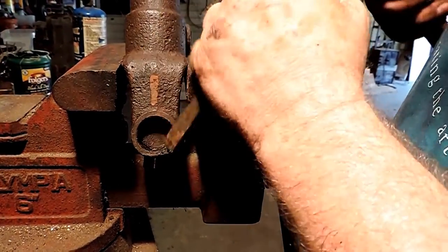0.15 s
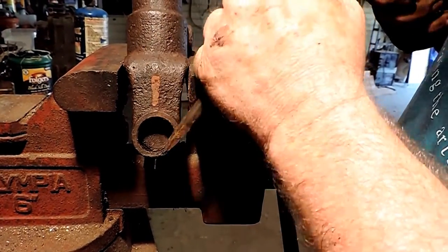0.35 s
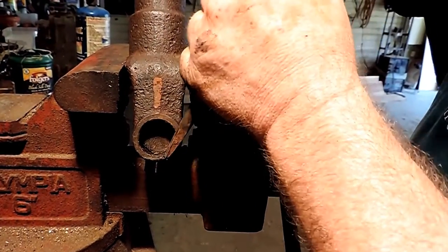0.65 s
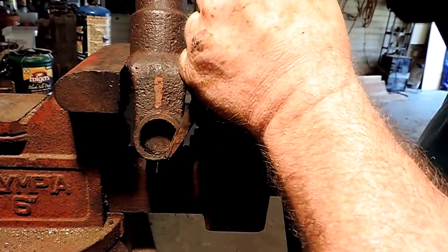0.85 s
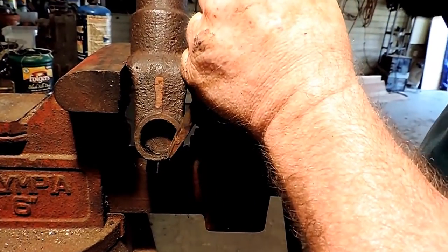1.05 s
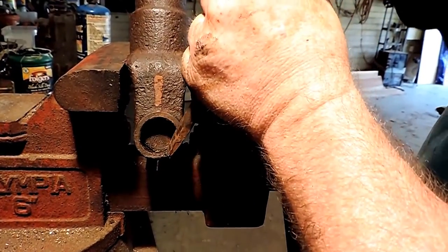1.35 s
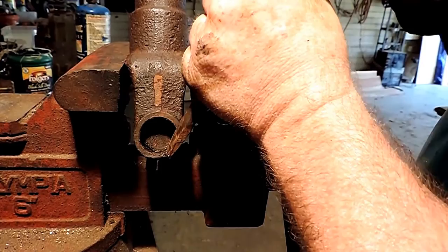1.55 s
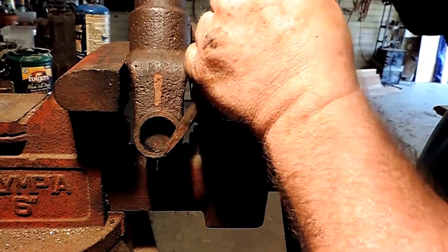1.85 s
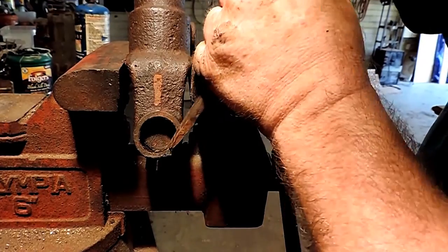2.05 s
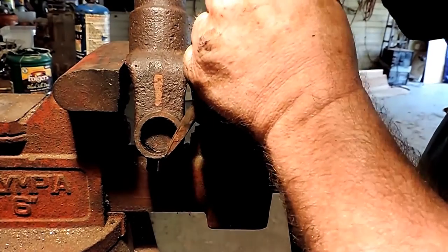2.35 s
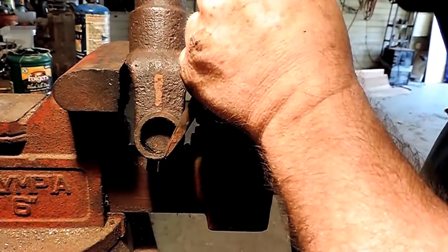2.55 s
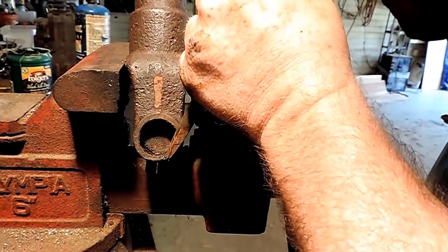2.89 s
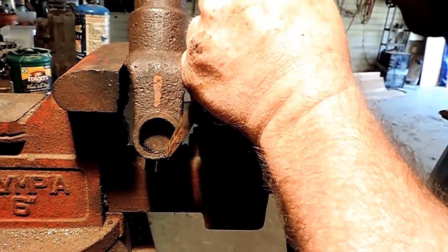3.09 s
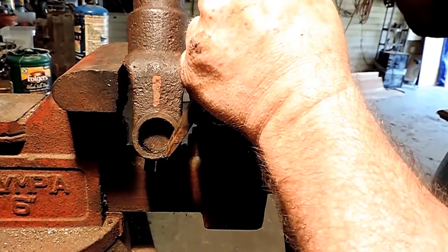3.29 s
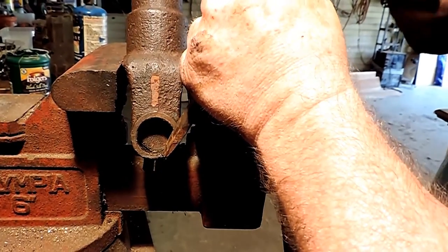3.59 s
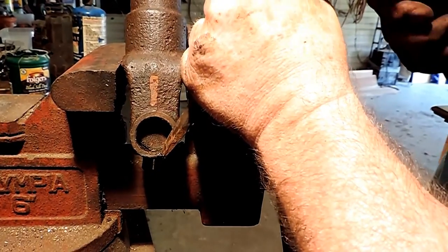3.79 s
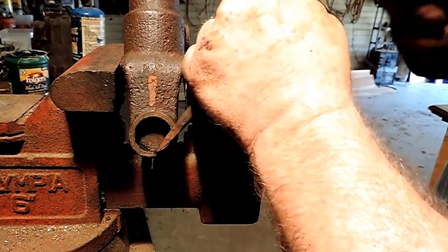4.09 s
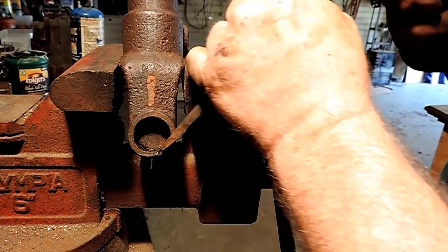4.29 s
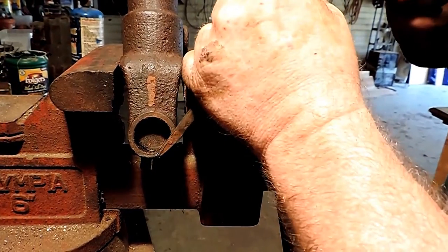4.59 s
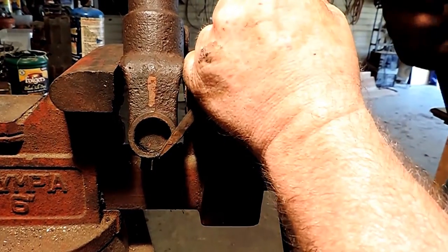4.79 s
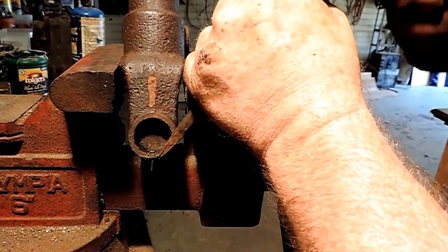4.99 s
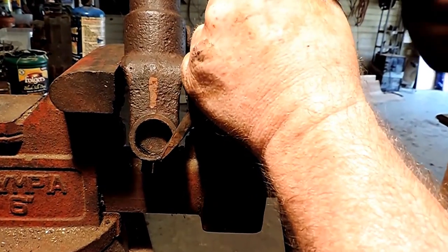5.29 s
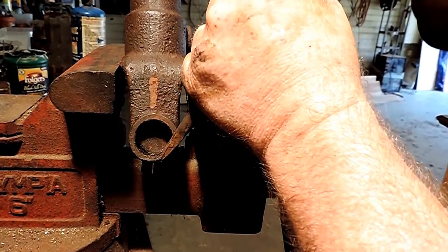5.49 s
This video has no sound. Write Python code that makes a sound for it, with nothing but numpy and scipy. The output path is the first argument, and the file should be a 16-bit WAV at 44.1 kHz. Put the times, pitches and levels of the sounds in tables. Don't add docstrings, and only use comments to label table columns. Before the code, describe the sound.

In an echoing garage, sharp hammer strikes on a chisel come in evenly spaced groups, separated by small ticks, one faint clink and surging low rumble.

```python
import sys
import numpy as np
from scipy import signal
from scipy.fft import rfft, irfft
from scipy.io import wavfile
from scipy.ndimage import uniform_filter1d, minimum_filter1d

SR = 44100
rng = np.random.default_rng(int(sys.argv[2]) if len(sys.argv) > 2 else 0)


def inscribe(sig):
    pcm = np.round(np.clip(np.atleast_2d(sig).T, -1, 1) * 32767)
    wavfile.write(sys.argv[1], SR, pcm.astype(np.int16))


def field_ratio(decibels):
    return 10 ** (np.asarray(decibels, dtype=float) / 20)


N = 248724

# [t/s, level/dB]
GAIN = [(0.0, -42), (0.35, -36), (0.64, -29), (0.83, -24.5), (1.08, -27.5), (1.59, -36), (1.96, -42),
        (2.26, -38.5), (2.8, -25.5), (2.91, -24.5), (3.17, -29), (3.36, -32.5), (3.7, -39), (4.16, -44),
        (4.6, -44.5), (5.01, -35.5), (5.38, -36), (5.64, -37.5)]
# [f/Hz, level per Hz/dB]
RUMBLE = [(15, -59), (25, -28), (39, -16.5), (54, -5), (70, -3), (116, -15), (164, -6), (225, -15.5),
          (271, -8.5), (326, -12), (382, -8.5), (1470, -22), (3530, -41), (12900, -63.5), (14000, -60)]
# [f/Hz, width/Hz, level/dB]
ROOM_MODES = [(88.8, 27, 1.5), (174.4, 9.3, -9), (271, 13, 1), (313, 14, 1.5), (388.4, 4, 10),
              (460, 3, 0.5), (519.6, 6.9, -0.5)]
HUM_SKEW = [
    [.11],
    [-.11],
]
# [f/Hz, level per Hz/dB]
HISS = [(1500, -32.5), (3000, -1), (6000, -4), (13000, 2.5), (13700, -60.5)]
# [f/Hz, left minus right/dB]
FAR_PORTS = [
    [(40, .97), (300, .99), (600, 0.83), (1000, .66), (2400, 0.3), (6000, -0.15), (14000, 0.4)],
    [(200, 0), (700, -.5), (2000, .5), (12000, 0)],
]
NEAR_PORTS = [
    [(300, 0.95), (600, 0.036), (1000, 0.59), (2400, 0.16), (6000, 0.077), (14000, 0.025)],
    [(200, 2), (700, -4), (1500, 2.5), (3000, 0), (8000, -0.1), (13000, -1)],
]
# [f/Hz, level per Hz/dB]
ECHO = [(180, -40), (300, -13), (500, -5.5), (1100, -10.5), (2600, -21), (3400, -23.5), (4300, -25.5),
        (5200, -33), (7500, -37.5), (9000, -37.5), (9800, -46), (12100, -39), (12700, -50.5), (13700, -100)]
# [f/Hz, t60/s]
GARAGE_DECAY = [(300, 0.36), (1000, 0.47), (3000, 0.62), (7000, 0.6), (13000, 0.38)]
# [f/Hz, level per Hz/dB]
SNAP = [(880, -33.5), (1500, -5.5), (2570, 2), (4040, 1), (4740, -10.5), (5670, -14), (7430, -8.5),
        (9440, -17.5), (14800, -16.5), (16400, -36)]
# [f/Hz, level per Hz/dB]
CRACK = [(710, 2.5), (1200, 3), (1920, -6), (2420, 0.5), (3110, -6.5), (4460, -8), (5420, -20.5),
         (7530, -18), (9470, -28.5), (12400, -18), (13600, -39), (15500, -37), (16400, -52)]
# [f/Hz, level/dB, t60/s]
BENCH = [(175.2, -1, 0.31), (282, -2, 0.41), (368.4, 0, 0.085), (645.3, 2, 0.14), (782, -3.5, 0.069),
         (1048, 0, 0.18), (1327, -3, 0.29), (1508, 0.5, 0.13), (1682, -7.5, 0.22), (1853, -11.5, 0.13),
         (2103, -6, 0.061), (2385, -12, 0.03)]
# [delay/s, signed gain/1]
PATHS = [(.0026, 0.0077), (.0044, -1.8), (.0067, 1.38), (.0093, 0.98), (0.013, 1.26), (0.0167, 0.93),
         (.023, .3), (.028, 0.27), (.034, -0.44)]
# [f/Hz, level/dB, t60/s]
EDGE_STEEL = [(10800, -8, .03), (5430, -9, .04), (8600, -17.5, .08)]
HEAD_STEEL = [(12030, 0, .22), (12180, -8, .2), (12730, -18, .15), (8850, -14, .12), (7600, -14, .15),
              (4300, -10, .3)]
CHISEL_STEEL = [(4800, -5, 0.28), (8660, 2, 0.19), (10000, -10, .2), (10850, -17, .2), (12100, -14, .15),
                (12690, -21, .2), (13320, -5, .18)]
# [t/s, tick/dB, thud/dB, tick f/Hz, edge ring/dB]
KNOCKS = [
    (.446, -39, -36, 5540, -52),
    (0.6325, -30.5, -37, 1190, -54),
    (0.898, -23, -15.5, 1800, -50),
    (2.344, -33.5, -33.5, 1695, -68),
    (2.4936, -34, -37, 6550, -42),
    (2.852, -65.5, -42.5, 10800, -50),
    (4.986, -23, -29, 2430, -60),
    (.7925, -51, -28.5, 1200, -75),
]
# [t/s, strength/dB, top brightness/dB, lifted crack f/Hz, head ring against strength/dB]
BLOWS = [
    (1.2016, -5, -2, 4077, -46),
    (1.4991, -9, 0, 2490, -39),
    (1.7864, -13, 0, 6750, -36),
    (2.9315, -3.5, -4, 4690, -35),
    (3.25, -6, 2.5, 4640, -33),
    (3.5712, -11, 6.5, 4265, -26),
    (3.89, -14, 7, 3870, -33.5),
    (5.437, -11, -3, 2780, -33),
]
# [from t/s, lifted f/Hz]
SEATS = [
    (0.9, 8300),
    (1.35, 7100),
    (2.5, 4110),
    (5.0, 8000),
]
# [tick/dB, top brightness/dB, lifted f/Hz, ring/dB]
CLINK = (-34.5, 13, 5500, -41)
CLINK_S = 4.2299

HUM_HZ = 59.2
RUMBLE_DB, HUM_DB, HISS_DB = 3, 3, -37.5
HUM_SLOPE, HISS_SLOPE = 1.177, 1.12
LEFTOVER_DB, LEFTOVER_HZ = -44.5, 5000
PUSH_HZ = 486
KNOCK_ECHO_DB, KNOCK_CLATTER_DB, KNOCK_LIFT_DB, KNOCK_ECHO_LIFT_DB = -19.5, 2, 9.5, 11
KNOCK_RATTLE_S = 0.12
KNOCK_MID_HZ, KNOCK_TOP_DB_PER_OCTAVE = 5050, 8
THUD_DB, THUD_SLOPE = -3, 1.327
ECHO_DB, ECHO_SLOPE = -23.5, 0.92
CLATTER_DB, CLATTER_SLOPE = -2, 0.7
BLOW_LIFT_DB, BLOW_ECHO_LIFT_DB, BLOW_RATTLE_S = 4, 5, 0.12
CLINK_THUD_DB, CLINK_ECHO_DB, CLINK_CLATTER_DB = -64, -53.5, 4
CLINK_LIFT_DB, CLINK_RATTLE_DB, CLINK_RATTLE_S = 12.5, 4.5, 0.17
TREBLE_HZ, TOP_HZ, EDGE_HZ = 4000, 13600, 16400
FRAME_S, FRAME_START_S = 1024 / 48000, 0.008


def evened(x):
    return x / np.sqrt(np.mean(x ** 2) + 1e-20)


def read(points, hz):
    f, value = np.transpose(points)
    return np.interp(np.log(hz + 1), np.log(f + 1), value)


def noise(size, colour, tilt_db=0, peak_hz=1000, peak_db=0):
    hz = np.fft.rfftfreq(size, 1 / SR)
    spectrum = rfft(rng.standard_normal((2, size))) * field_ratio(read(colour, hz))
    plain = irfft(spectrum, size)
    tilt = tilt_db * np.clip(np.log2(hz / 2800 + 1e-9), 0, 2) / 1.98
    peak = peak_db * np.exp(-(np.log(hz / peak_hz + 1e-9) / 0.16) ** 2)
    return irfft(spectrum * field_ratio(tilt + peak), size) / np.sqrt(np.mean(plain ** 2))


def ports(a, b, table):
    hz = np.fft.rfftfreq(len(a), 1 / SR)
    same, balance_db = (read(points, hz) for points in table)
    same = np.clip(same, -1, 1)
    left = rfft(a)
    right = same * left + np.sqrt(1 - same ** 2) * rfft(b)
    half = field_ratio(balance_db / 2)
    return irfft(np.array([left * half, right / half]), len(a))


def garage():
    t, hz = np.arange(N) / SR, np.fft.rfftfreq(N, 1 / SR)
    gain_db = np.interp(t, *np.transpose(GAIN))
    lift = 1 + sum(0.57 * field_ratio(db) / (1 + (2 * (hz - f) / width) ** 2) for f, width, db in ROOM_MODES)
    rumble = ports(*evened(irfft(rfft(noise(N, RUMBLE)) * lift, N)), FAR_PORTS)
    slow = uniform_filter1d(rng.standard_normal((2, N)), 3000)
    loudness_drift, pitch_drift = evened(uniform_filter1d(slow, 3000))
    turns = np.cumsum(HUM_HZ + 0.22 * pitch_drift) / SR
    hum = (1 + 0.07 * loudness_drift) * np.sqrt(2) * np.sin(2 * np.pi * turns + HUM_SKEW)
    hiss = noise(N, HISS) * field_ratio(HISS_SLOPE * gain_db + HISS_DB)
    return hiss + rumble * field_ratio(gain_db + RUMBLE_DB) + hum * field_ratio(HUM_SLOPE * gain_db + HUM_DB)


def echo(size, top_db, peak_hz, peak_db):
    source = noise(size, ECHO, 1.1 * top_db, peak_hz, 0.846 * peak_db)
    hz, t, z = signal.stft(source, SR, nperseg=256)
    fade_db = -60 * np.maximum(t - 0.06, 0) / read(GARAGE_DECAY, hz)[:, None]
    return signal.istft(z * field_ratio(fade_db), SR, nperseg=256)[1][:, :size]


def ring(modes, t, detune):
    phases = rng.random((2, len(modes), 1))
    hz, db, t60 = np.transpose(modes)[:, :, None]
    hz = hz * (1 + detune * rng.standard_normal(hz.shape))
    sines = field_ratio(db - 60 * t / t60) * np.sin(2 * np.pi * (hz * t + phases))
    return sines.sum(1) / np.linalg.norm(field_ratio(db))


def chime(steel, t):
    ruffle = evened(uniform_filter1d(rng.standard_normal((2, 2, len(t))), 250))
    direct = ring(steel, t, 0.00078) * (1 + 0.6 * ruffle[0])
    slow = [(hz, db, 1.6 * t60) for hz, db, t60 in steel]
    room = ring(slow, t, 0.002) * ruffle[1] * (1 - np.exp(-t / 0.01))
    return direct + 0.34 * room


def push(t):
    delay, gain = np.transpose(PATHS)[:, :, None]
    pulse_hz = PUSH_HZ / (1 + (delay / 0.04) ** 2)
    since = t - delay - 0.00012 * rng.standard_normal(delay.shape)
    u = (np.pi * pulse_hz * since) ** 2
    gain = gain * (1 + 0.026 * rng.standard_normal(gain.shape))
    return (gain * (1 - 2 * u) * np.exp(-u)).sum(0)


def strike(steel, crack_db, thud_db, echo_db, ring_db, top_db, crack_hz, lift_db,
           echo_hz, echo_lift_db, clatter_db, rattle_s, rattle_db=0):
    t = np.arange(32768) / SR
    limiter = field_ratio(-14 / (1 + np.exp(-(t - 0.017) / 0.0037)))
    late = np.maximum(t - 0.002, 0)
    snap = noise(len(t), SNAP, top_db, crack_hz, lift_db)
    snap = snap * field_ratio(-60 * late / 0.017) * np.minimum(t / 0.00014, 1)
    rattle = field_ratio(rattle_db) * noise(len(t), CRACK, top_db, crack_hz, lift_db)
    rattle = rattle * field_ratio(-40 * t / rattle_s) * (1 - np.exp(-t / 0.0012))
    clatter = field_ratio(clatter_db) * ring(BENCH, late, 0.012) * (1 - np.exp(-late / 0.0027))
    contact = field_ratio(crack_db - 4.5) * (snap + rattle) + field_ratio(thud_db + 9) * clatter
    near = contact * limiter + field_ratio(ring_db) * chime(steel, t)
    wet = field_ratio(echo_db) * echo(len(t), top_db, echo_hz, echo_lift_db) * (1 - np.exp(-t / 0.005))
    both = ports(*near, NEAR_PORTS) + ports(*wet, FAR_PORTS) + field_ratio(thud_db + 7) * push(t)
    return both * np.clip((t[-1] - t) / 0.2, 0, 1)


def knock(db, thud_db, hz, ring_db):
    return strike(EDGE_STEEL, db, thud_db, db + KNOCK_ECHO_DB, ring_db,
                  top_db=KNOCK_TOP_DB_PER_OCTAVE * np.log2(hz / KNOCK_MID_HZ),
                  crack_hz=hz, lift_db=KNOCK_LIFT_DB, echo_hz=hz, echo_lift_db=KNOCK_ECHO_LIFT_DB,
                  clatter_db=db - thud_db + KNOCK_CLATTER_DB, rattle_s=KNOCK_RATTLE_S)


def blow(s, db, top_db, crack_hz, ring_db):
    echo_hz = [hz for start, hz in SEATS if start < s][-1]
    return strike(HEAD_STEEL, db, THUD_DB + THUD_SLOPE * db, ECHO_DB + ECHO_SLOPE * db, db + ring_db,
                  top_db=top_db, crack_hz=crack_hz, lift_db=BLOW_LIFT_DB,
                  echo_hz=echo_hz, echo_lift_db=BLOW_ECHO_LIFT_DB,
                  clatter_db=CLATTER_DB + CLATTER_SLOPE * top_db, rattle_s=BLOW_RATTLE_S)


def clink(db, top_db, hz, ring_db):
    return strike(CHISEL_STEEL, db, CLINK_THUD_DB, CLINK_ECHO_DB, ring_db,
                  top_db=top_db, crack_hz=hz, lift_db=CLINK_LIFT_DB, echo_hz=hz, echo_lift_db=4,
                  clatter_db=CLINK_CLATTER_DB, rattle_s=CLINK_RATTLE_S, rattle_db=CLINK_RATTLE_DB)


def add(mix, s, sound):
    part = mix[:, round(s * SR):][:, :sound.shape[1]]
    part += sound[:, :part.shape[1]]


def hammering():
    out = np.zeros((2, N))
    add(out, 0, field_ratio(LEFTOVER_DB) * ports(*echo(SR, -9, LEFTOVER_HZ, 5), FAR_PORTS))
    for s, *row in KNOCKS:
        add(out, s, knock(*row))
    for row in BLOWS:
        add(out, row[0], blow(*row))
    add(out, CLINK_S, clink(*CLINK))
    return out


def scene():
    return hammering() + garage()


def thin_treble(x):
    hz, t, z = signal.stft(x, SR, nperseg=128, noverlap=112)
    treble = z[:, hz > TREBLE_HZ]
    hz = hz[:, None]
    power_db = 10 * np.log10((abs(treble) ** 2).mean((0, 1)) + 1e-14)
    frame = np.ceil((t - FRAME_START_S) / FRAME_S).astype(int)
    first = np.searchsorted(frame, np.arange(frame[-1] + 1))
    loudest_db = np.maximum.reduceat(power_db, first)
    noticed = loudest_db > power_db[np.minimum(first + 7, len(t) - 1)] + 12
    noticed = (noticed | np.roll(noticed, 1))[frame]
    ahead_db = -minimum_filter1d(-power_db, size=61, origin=-30)
    coming_db = np.minimum(ahead_db, loudest_db[frame])
    past_db = minimum_filter1d(power_db, size=29, origin=14)
    keep = np.where(hz > TREBLE_HZ, power_db > coming_db - 24, 1.0)
    keep_top = keep * (power_db > past_db + 20) * noticed * (hz < EDGE_HZ)
    kept = z * np.where(hz > TOP_HZ, keep_top, keep)
    return signal.istft(kept, SR, nperseg=128, noverlap=112)[1][:, :N]


def roll_off(x):
    return signal.sosfilt(signal.butter(12, 16510, fs=SR, output="sos"), x)


def record(dry):
    clipped = dry / (1 + abs(dry) ** 6) ** (1 / 6)
    mix = thin_treble(clipped)
    return roll_off(mix)


dry = scene()
out = record(dry)
inscribe(out)
```